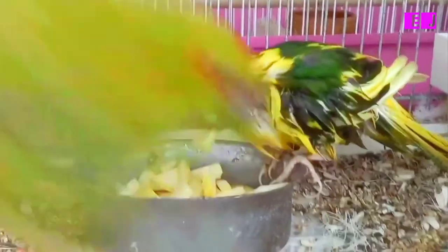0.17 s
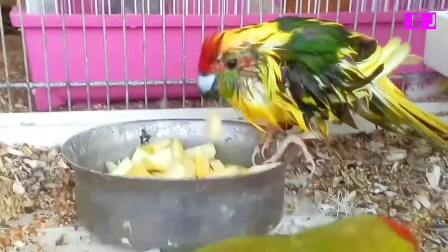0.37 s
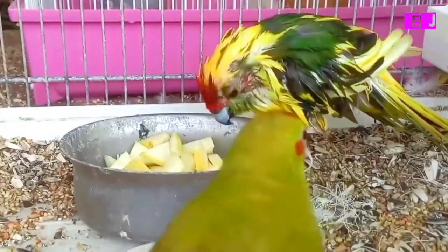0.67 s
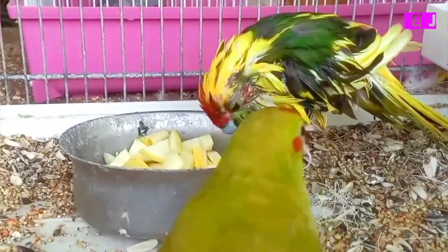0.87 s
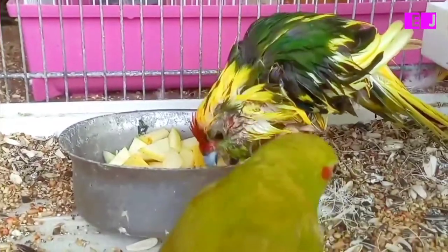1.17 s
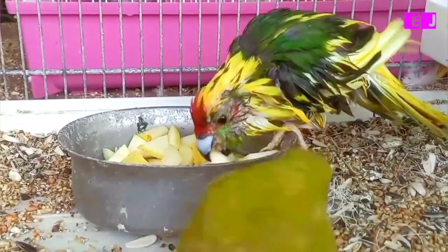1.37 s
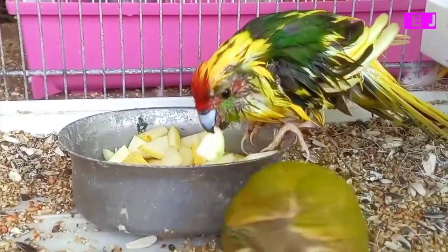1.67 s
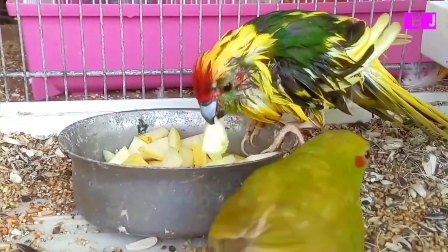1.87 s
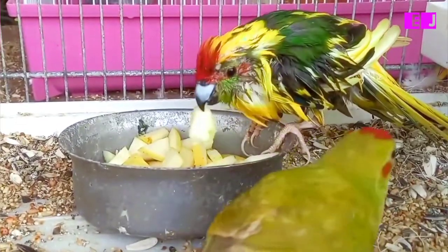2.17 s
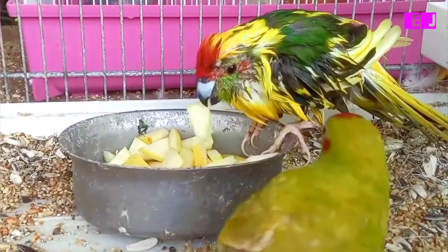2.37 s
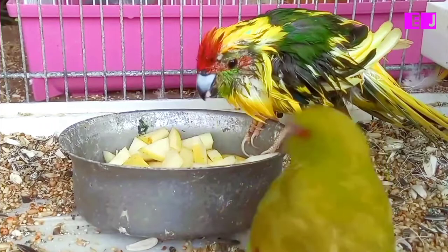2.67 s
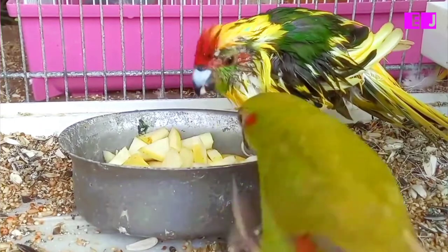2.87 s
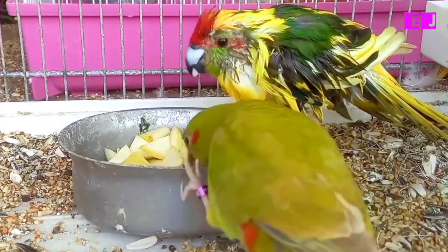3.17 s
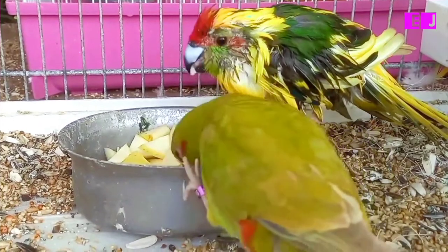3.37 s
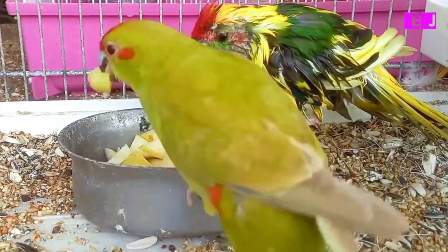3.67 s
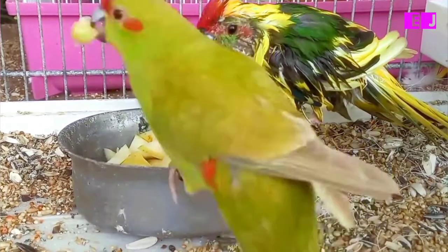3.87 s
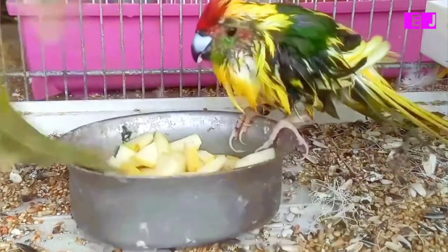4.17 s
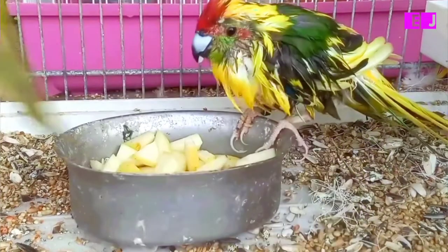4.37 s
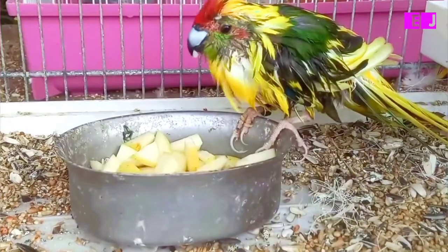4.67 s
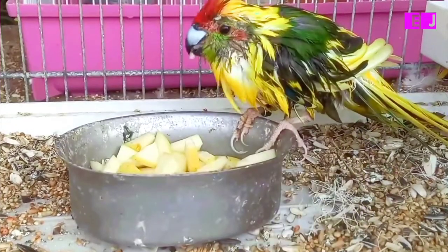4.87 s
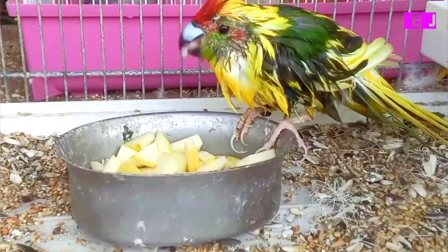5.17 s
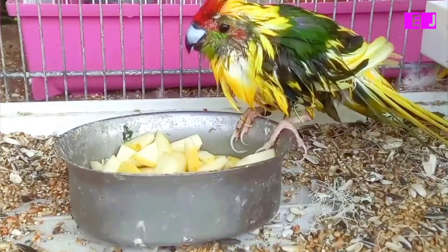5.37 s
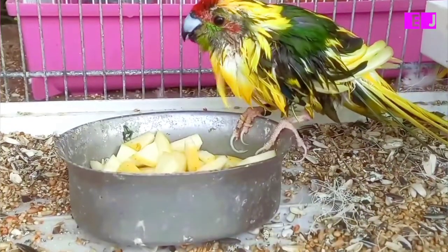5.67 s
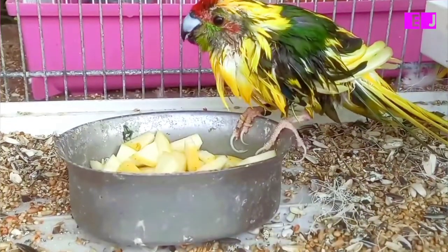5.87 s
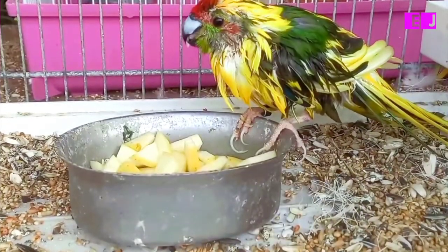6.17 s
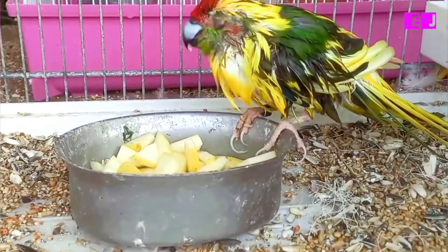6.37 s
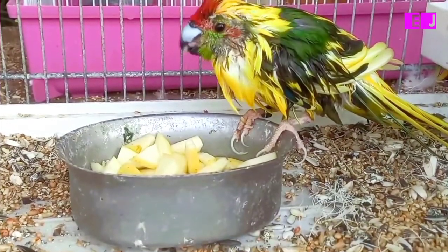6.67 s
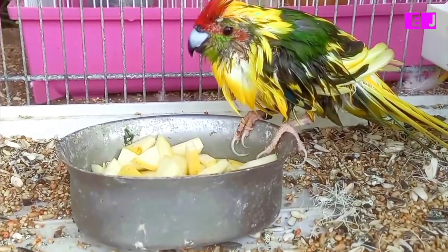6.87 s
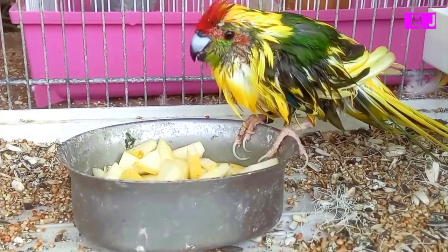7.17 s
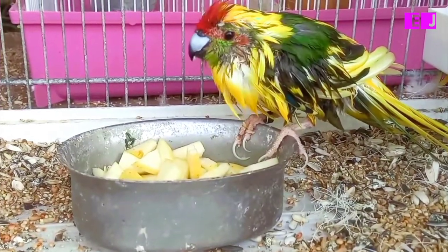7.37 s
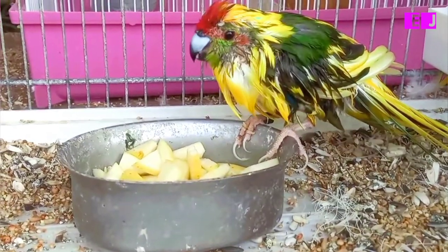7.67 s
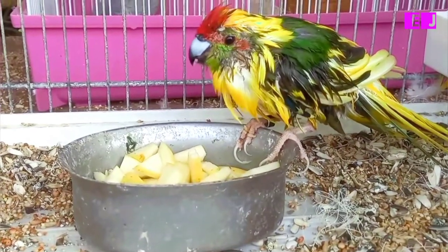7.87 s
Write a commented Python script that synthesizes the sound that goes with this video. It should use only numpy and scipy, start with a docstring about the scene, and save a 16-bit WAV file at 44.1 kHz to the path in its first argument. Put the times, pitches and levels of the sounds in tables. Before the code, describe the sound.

Very close to a cage floor, a sharp metal bowl knock with wire twang and a wing thump opens, then light beak ticks and rustling husks. Around four seconds a bird takes off with clatter, flutter and heavy left-side air thumps. After a lull, a nearby parrot shrieks painfully loud, distorting and echoing in the room. Quiet hiss, soft low hums and distant chirps finish.

```python
"""In a lively room, two small parrots feed from a steel bowl in a cage, a hand's width from a phone.
Beaks and claws tap as bursts of noise; bowl, wires and tray ring as decaying modes; feathers and husks rustle
as grainy noise. Wing gusts thump the left microphone port as a damped low tone with eddies.
Far birds chirp as bending tones and one bird close by shrieks so loudly that the input saturates.
Hiss and a swelling low rumble lie underneath."""
import sys
import numpy as np
from scipy import signal
from scipy.fft import rfft, irfft
from scipy.io import wavfile
from scipy.ndimage import uniform_filter1d

SR = 44100
rng = np.random.default_rng(int(sys.argv[2]) if len(sys.argv) > 2 else 0)


def dump(signal):
    """Clip the signal to [-1, 1] and save it as 16-bit WAV at the path in sys.argv[1]."""
    limited = np.clip(np.atleast_2d(signal).T, -1, 1)
    pcm = np.round(limited * 32767).astype(np.int16)
    wavfile.write(sys.argv[1], SR, pcm)


N = 353196
T = np.arange(N) / SR

# Resonant modes of the steel bowl: mode_hz, level_db, t60_s
BOWL_MODES = [(1478, -2, 0.05), (1505, -2, 0.13), (1550, -10.5, 0.08), (2350, -3, 0.05),
              (3003, -18.5, 0.069), (4280, -4, 0.046), (5000, -5, 0.1), (6320, -3, 0.084),
              (6600, -3.5, 0.039)]
# Resonant modes of the plastic tray: mode_hz, level_db, t60_s
TRAY_MODES = [(279, -5, 0.12), (402, -6, 0.067), (489, -2, 0.04), (536, -5.5, 0.14), (729, -6, 0.036),
              (819, -5, 0.042)]


def undb(db):
    """Amplitude ratio from dB."""
    return 10 ** (np.asarray(db) / 20)


def sides(pan_db):
    """Left and right gains, as a column, for a left minus right level difference."""
    return undb(np.array([[pan_db], [-pan_db]]) / 2)


def colour(x, points):
    """Shapes the spectrum along (Hz, dB) points on a log frequency axis."""
    hz, db = np.transpose(points)
    size = x.shape[-1]
    bin_hz = np.fft.rfftfreq(size, 1 / SR)
    gain_db = np.interp(np.log(bin_hz + 1), np.log(hz), db)
    return irfft(rfft(x) * undb(gain_db), size)


def bandpass(x, lo_hz, hi_hz):
    """Second-order Butterworth band-pass."""
    return signal.sosfilt(signal.butter(2, [lo_hz, hi_hz], "band", fs=SR, output="sos"), x)


def band(x, lo_hz, hi_hz):
    """Band-pass scaled to unit rms."""
    y = bandpass(x, lo_hz, hi_hz)
    return y / np.sqrt(np.mean(y ** 2))


def add(out, s, sound):
    """Mixes a sound in at s seconds."""
    i = int(s * SR)
    out[:, i:i + sound.shape[1]] += sound[:, :N - i]


def walk(rate_hz, size=N):
    """Random levels held 1 / rate_hz and slewed twice; spread near 1."""
    hold = int(SR / rate_hz)
    steps = np.repeat(rng.standard_normal(size // hold + 1), hold)
    return 1.3 * uniform_filter1d(uniform_filter1d(steps, hold), hold)[:size]


def room(x):
    """Diffuse echoes, unrelated left and right, each band dying at its own rate."""
    # Reverberation time by band: band_hz, t60_s
    room_t60 = [(250, .45), (1000, .4), (3000, .47), (6000, .44), (12000, .3)]
    t, tail = T[:SR], 0
    for hz, t60_s in room_t60:
        noise = band(rng.standard_normal((2, SR)), hz * .55, hz * 1.6)
        tail = tail + np.sqrt(hz) * noise * undb(-60 * t / t60_s)
    tail = tail * np.clip((t - .004) / 0.0085, 0, 1)  # echoes start at 4 ms and build up over 8.5 ms
    tail = tail / np.sqrt(np.sum(tail ** 2) / 2)
    return signal.fftconvolve(x, tail, axes=1)[:, :N]


def part_shared_noise(size):
    """Two-channel noise with a weaker part common to both channels."""
    return rng.standard_normal((2, size)) + 0.79 * rng.standard_normal((1, size))


def hiss():
    """Coloured room and microphone noise, mostly unrelated left and right, wavering slowly."""
    # Noise spectrum, relative: hz, density_db_per_hz
    hiss_spectrum = [(20, -49), (45, -24.5), (75, -2), (125, -16), (170, -16.5), (280, -15.5), (450, -19.5),
                     (700, -24), (1300, -27), (3000, -41.5), (5500, -39.5), (15300, -35)]
    # Noise balance: hz, left_minus_right_db
    hiss_balance = [(60, 3), (700, 0.5), (1500, -9), (15000, 0)]
    noise = colour(part_shared_noise(N), hiss_spectrum)
    noise[0] = colour(noise[0], hiss_balance)
    level_db, waver_db = -54, 1.2
    return noise / np.sqrt(np.mean(noise ** 2)) * undb(level_db + waver_db * walk(3))


def rumble():
    """Low band of noise that swells and sinks."""
    # Rumble level: time_s, level_db
    rumble_level = [(0.0, -45), (0.42, -50), (0.82, -53.5), (3.46, -53.5), (3.97, -49.5), (4.32, -42),
                    (4.48, -49), (5.02, -51), (5.57, -45), (5.87, -59.5), (7.65, -47), (8.01, -54)]
    swell_db = 2.5
    noise = band(band(part_shared_noise(N), 55, 110), 54, 160)
    level_db = np.interp(T, *np.transpose(rumble_level)) + swell_db * walk(4.5)
    return noise * undb(level_db) * sides(3.3)


def whistle(hz, db, second_db, rough):
    """A near sine with its octave; roughness shakes pitch and amplitude irregularly."""
    slow, quick, size = (walk(rate, size=len(hz)) for rate in (150, 900, 700))
    shaken_hz = hz * (1 + .004 * slow + .12 * rough * quick)
    phase = 2 * np.pi * np.cumsum(shaken_hz) / SR
    return undb(db) * (1 + rough * size) * (np.sin(phase) + undb(second_db) * np.sin(2 * phase))


def bending_tones(calls, rough):
    """Short tones under a rounded envelope; pitch bends fast at first, then settles at its end value."""
    out = np.zeros((2, N))
    for s, length_s, start_hz, end_hz, db, second_db, pan_db in calls:
        part = np.arange(0, length_s, 1 / SR) / length_s
        hz = end_hz + (start_hz - end_hz) * (1 - part) ** 2
        shape = np.sin(np.pi * part ** 0.86)
        add(out, s, shape * whistle(hz, db, second_db, rough) * sides(pan_db))
    return out


def hums():
    """Soft low tones with slight roughness."""
    # Low tones: start_s, length_s, start_hz, end_hz, level_db, second_partial_db, left_minus_right_db
    hum_calls = [(5.83, .1, 327, 346.7, -53.5, -25, 0), (6.33, 0.1, 338, 335.5, -52.5, -30.5, 0.0017),
                 (6.55, 0.076, 330, 347, -55, -28, 0.00079), (6.86, 0.085, 339, 350, -45, -31, 0.0062)]
    return bending_tones(hum_calls, rough=.05)


def chirps():
    """Far birds: brief, slightly rough bending tones."""
    # Far chirps: start_s, length_s, start_hz, end_hz, level_db, second_partial_db, left_minus_right_db
    chirp_calls = [(1.012, 0.06, 2560, 2810, -51, 0, -16.5), (1.045, 0.047, 1303, 1414, -52, -36.5, -5),
                   (1.122, 0.043, 2720, 2826, -42, -9.5, 2), (6.628, 0.043, 5150, 4960, -39, -38, -8.5),
                   (6.642, 0.027, 6400, 6170, -51, -32, 8), (6.93, 0.057, 1360, 1433, -50, -9.5, -3),
                   (7.308, 0.042, 4980, 4916, -34.5, -38, -5), (7.325, 0.0075, 6100, 6100, -42, -30, -5),
                   (7.415, 0.065, 3080, 2770, -45.5, -28, -1), (7.455, 0.037, 5130, 4780, -33, -26, 3.5),
                   (7.74, 0.061, 2765, 3040, -43.5, -5, -2), (7.855, .058, 2833, 2954, -40, -7.5, 7)]
    return bending_tones(chirp_calls, rough=.09)


def shriek():
    """Two piercing notes, the second sliding down and breaking up into hoarse air."""
    # Pitch track of each of the two notes: time_s, pitch_hz, level_db, second_partial_db, roughness (0-1)
    shriek_notes = [
        [(5.461, 3838, -38.5, -22, 0.01), (5.468, 3870, -6, -25.5, 0), (5.476, 3878, 1.5, -22, 0.06),
         (5.495, 3831, 6, -5, 0.14), (5.52, 3624, 11.5, -16.5, 0.12), (5.545, 3654, 8.5, -19.5, 0.19),
         (5.555, 3680, -29, -39.5, 0)],
        [(5.542, 2800, -13.5, -2.5, .05), (5.555, 2755, 1, -10.5, .05), (5.605, 2691, 3, -2, .07),
         (5.63, 2408, -3.5, 7.5, .12), (5.66, 1933, -16, 20, .25), (5.685, 2040, -18, 19, 0.91),
         (5.71, 2192, -22.5, 5.5, 0.94), (5.73, 2244, -16.5, 1.5, 1.04)],
    ]
    pan_db, left_lag_samples = 3.3, 3
    out, air = np.zeros((2, N)), band(rng.standard_normal(SR), 4400, 11000)
    for note in shriek_notes:
        s, *columns = np.transpose(note)
        t = np.arange(s[0], s[-1], 1 / SR)
        hz, db, second_db, rough = (np.interp(t, s, c) for c in columns)
        hoarse = undb(db + second_db - 8.5) * rough * air[:len(t)]
        voice = whistle(hz, db, second_db, rough) + hoarse
        add(out, s[0], voice * sides(pan_db))
    return np.array([np.roll(out[0], left_lag_samples), out[1]])


def gusts():
    """Pushes of air ring the low resonance of the microphone port; eddies buffet above it."""
    # Wing gusts: start_s, left_level_db, left_minus_right_db, rise_ms, eddy_share_db
    gust_events = [(.218, -8, 7, 13, -22.5), (0.266, -17, 6, 10, -19.5), (4.174, -3, 18, 21.6, -29),
                   (4.215, -21, 18, 12.6, -5.5), (4.24, -9, 24, 8.3, -20), (4.339, -12, 36, 18, -4),
                   (4.367, 4, 53, 6, -21), (4.409, -3.5, 43.5, 29, -33)]
    port_hz, port_t60_s = 76.8, 0.13
    out, t = np.zeros((2, N)), T[:SR // 4]
    tone = np.sin(2 * np.pi * port_hz * t)
    eddies = band(band(rng.standard_normal((len(gust_events), len(t))), 110, 240), 95, 400)
    for (s, db, pan_db, rise_ms, eddy_db), eddy in zip(gust_events, eddies):
        rise_s = rise_ms / 1000
        rise = np.sin(np.pi / 2 * np.minimum(t / rise_s, 1))
        push = rise * undb(-60 * np.maximum(t - rise_s, 0) / port_t60_s)
        add(out, s, push * (tone + undb(eddy_db) * eddy) * undb([[db], [db - pan_db]]))
    return out


def rustle():
    """Dense tiny scrapes in three registers: a slow bed plus swishes, roughened by random grains."""
    # Steady stirring of feathers and husks, middle register before graining: time_s, level_db
    stirring = [(0, -60.5), (.5, -63.5), (1.3, -64), (1.55, -64.5), (2.3, -69), (2.8, -64), (3.5, -68),
                (3.75, -64.5), (4.15, -55.5), (4.4, -62), (4.9, -64), (5.4, -66.5), (5.55, -77.5),
                (6.2, -80), (6.4, -70.5), (7.1, -72.5), (7.5, -57), (8.01, -67)]
    # Wing flicks and scuffles through the husks, middle register before graining:
    # start_s, rise_s, fade_t60_s, level_db, share_above_8khz_db, share_under_2khz_db
    swishes = [(.105, 0.0037, 0.14, -49, 4, -10), (0.2, 0.0026, 0.28, -24, -7, 0.5),
               (.5, 0.074, 0.24, -54.5, -13, 1), (.691, 0.011, 0.15, -43.5, -15, -5.5),
               (0.829, 0.0069, 0.18, -46, -1.5, -10.5), (0.998, 0.052, 0.6, -49, -1, -26.5),
               (1.364, .003, 0.29, -51.5, 16.5, -27), (1.398, 0.0029, 0.7, -42, -15, -13),
               (1.59, .003, 0.4, -46, -1, -21), (1.766, 0.0073, 0.37, -44, -4, -18),
               (1.83, 0.033, .4, -54.5, -1, -16), (2.018, 0.015, 0.33, -50, -20, -7.5),
               (2.08, 0.021, .12, -50.5, -21, -2.5), (2.609, 0.017, 0.5, -47, -9.5, -9),
               (2.717, 0.028, 0.33, -38, -10, -19), (2.91, 0.0053, 0.37, -50, 3.5, -2),
               (3.02, 0.03, 0.3, -66, -7, 19.5), (3.545, 0.042, 0.42, -38, -12.5, -37),
               (3.64, 0.0026, 0.15, -30.5, 18, -40), (3.66, 0.015, 0.26, -36.5, 6.5, -40),
               (3.76, 0.013, 0.36, -41.5, 3, -25), (3.858, .003, 1, -48, 5, -7),
               (3.947, 0.026, 0.078, -38.5, 13, -5), (4, 0.015, 0.14, -33.5, 9.5, 1),
               (4.09, .006, 0.51, -58, 14, -25), (4.133, 0.04, 0.24, -34.5, 10, -10.5),
               (4.228, 0.026, 0.19, -41.5, 19.5, -8.5), (4.52, 0.0047, 0.29, -57.5, 14, -14),
               (4.878, 0.036, 0.54, -61.5, 11, 2.5), (5.169, .13, 0.63, -41.5, 1.5, -9),
               (5.3, 0.056, 0.46, -43.5, 2, -9.5), (6.299, .034, 0.6, -58, 9, -1.5),
               (6.73, 0.067, 0.55, -56, 0.5, -5), (6.882, 0.022, 0.58, -48, 8, -2.5),
               (7.15, 0.0083, 0.29, -66.5, 14, 9), (7.4, 0.027, 0.15, -55, 19, -15),
               (7.428, 0.015, 0.31, -51.5, 19.5, -6)]
    bed_high_db, bed_low_db, pan_db = 1, -1.5, 1
    flicker_db, patch_db = 0.84, 2  # quick and slow wavering

    bed_db = np.interp(T, *np.transpose(stirring))
    power = undb([[0], [bed_high_db], [bed_low_db]] + bed_db) ** 2  # rows: middle, high, low
    for s, rise_s, t60_s, db, high_db, low_db in swishes:
        t = T[:int((rise_s + t60_s) * SR)]
        fade_db = -60 * np.maximum(t - rise_s, 0) / t60_s
        shape = np.minimum(t / rise_s, 1) ** 2 * undb(db + fade_db)
        add(power, s, (undb([[0], [high_db], [low_db]]) * shape) ** 2)

    crunch = uniform_filter1d((rng.random(N) < 900 / SR) * rng.exponential(1, N), size=24) * 24
    # Middle and low registers waver in two halves each: register row, lo_hz, hi_hz, noise width_hz
    halves = [(0, 2100, 4000, 5100), (0, 4000, 7200, 5100), (1, 8000, 14800, 6800),
              (2, 280, 900, 1720), (2, 900, 2000, 1720)]
    out = np.zeros((2, N))
    for register, lo_hz, hi_hz, width_hz in halves:
        waver = undb(flicker_db * walk(80) + patch_db * walk(14))
        grains = (1 + 0.3 * crunch) * waver * np.sqrt(power[register])
        noise = bandpass(grains * rng.standard_normal((2, N)), lo_hz, hi_hz)
        out += noise * np.sqrt(SR / 2 / width_hz)
    return out * sides(pan_db)


def rattle(x, modes, start_db):
    """Scrapes stronger than about start_db reach a hard object and keep its modes buzzing."""
    power = uniform_filter1d(x ** 2, size=441)
    drive = x * power / (power + undb(2 * start_db))
    out = 0
    for hz, db, t60_s in modes:
        q = hz * t60_s * np.pi / np.log(1000)
        out = out + undb(db) * signal.lfilter(*signal.iirpeak(hz, q, fs=SR), drive)
    return out


def struck(blows, modes, scatter_db):
    """Every blow rings the same decaying modes in new shares, slightly detuned."""
    out, t = np.zeros((2, N)), T[:SR // 3]
    hz, mode_db, t60_s = (c[:, None] for c in np.transpose(modes))
    for s, db, pan_db, tilt_db in blows:
        share, detune, phase = rng.standard_normal((3, len(modes), 1))
        tilt = tilt_db * np.log2(hz / hz[0])
        gain = undb(db + mode_db + tilt + scatter_db * share - 60 * t / t60_s)
        pitch_hz = hz * (1 + .003 * detune[0])  # all modes move together
        ring = np.sum(gain * np.sin(2 * np.pi * pitch_hz * t + 2 * phase), axis=0)
        add(out, s, .5 * sides(pan_db) * ring * np.minimum(t / 0.00025, 1))
    return out


def steps():
    """Feet excite the modes of the plastic tray."""
    # Footfalls, relative levels: start_s, level_db, left_minus_right_db, sharpness_db_per_octave
    footfalls = [(0.201, -19.5, -5, 3), (0.211, -30, 1.5, 4), (0.401, -38, -1, 4.5), (1.395, -48, -23.5, 4),
                 (1.585, -33.5, 1, 1.5), (1.771, -42.5, 4, -3), (1.956, -40.5, -1.5, 0.5),
                 (2.089, -44, -4.5, -4), (2.468, -51.5, 2, 8.5), (3.023, -34, 0.5, 5),
                 (3.051, -48.5, -6, 10.5), (4.016, -44, 13.5, 1.5), (7.41, -39, -22, -4)]
    return struck(footfalls, TRAY_MODES, 3.8)


def twangs():
    """Cage wires ring on a few high modes."""
    # Wire blows, relative levels: start_s, level_db, left_minus_right_db, sharpness_db_per_octave
    wire_blows = [(0, -35.5, 1, -2.5), (.135, -45.5, -2, 9), (.2, -21, 10, -5.5), (3.643, -37, -6, -10),
                  (3.858, -41, 7, 6), (4.63, -57, 0, 11.5), (4.69, -63, 3.5, 12.5), (4.76, -59, 3.5, 10.5),
                  (6.267, -45.5, 2.5, 6), (6.31, -47.5, 5.5, 3.5)]
    # Resonant modes of the cage wires: mode_hz, level_db, t60_s
    wire_modes = [(2290, 0, .32), (5750, -2, .28), (9990, -9, .18), (14700, -19, .14)]
    return struck(wire_blows, wire_modes, 1.5)


def knocks():
    """Knocks excite the modes of the steel bowl."""
    # Bowl blows, relative levels: start_s, level_db, left_minus_right_db, sharpness_db_per_octave
    bowl_blows = [(0.1968, -8.5, -1, -1), (0.2117, -15, -2.5, -8.5), (2.93, -49.5, -15, 11),
                  (3.026, -39, -5, -13), (3.0533, -37.5, -5.5, -7), (3.6444, -39, -18.5, -1),
                  (3.859, -28, -10, -2.5), (3.8797, -31.5, -11, -6), (3.97, -24, 4, -15),
                  (3.9896, -22, 1, -6), (4.016, -23, -13.5, -3.5), (6.8924, -47.5, -1, 6)]
    return struck(bowl_blows, BOWL_MODES, 1.0)


def taps():
    """Beak and claw cracks of noise around a centre over a broad click, each trailed by scattering husks."""
    # Taps, nominal peak levels: start_s, level_db, centre_hz, left_minus_right_db, t60_ms
    tap_events = [(0.1033, 0, 7200, 17, 4.7), (.199, 23.5, 2250, -9, 8.7), (0.2118, -1.5, 1850, -2, 64),
                  (0.599, -33.5, 6380, 3.5, 27), (.7032, -25.5, 5160, -1, 27), (0.7075, -27, 5830, 0, 27),
                  (0.817, -13.5, 4600, -3.5, 29), (0.8306, -12.5, 4160, 14, 6.7),
                  (1.3329, -36, 2230, -8.5, 17), (1.369, -29.5, 7000, 11, 13), (1.3945, -3.5, 5500, 6, 16),
                  (1.41, -32, 1500, 0, 40), (1.454, -23, 2800, 2, 16), (1.497, -31, 4940, 9, 17),
                  (1.585, -10.5, 5600, 2, 28), (1.7793, -20, 3780, 9, 22), (1.7856, -25, 3380, -17, 16),
                  (2.092, -31.5, 2460, 0, 26), (2.6386, -30, 6040, 18, 15), (2.7437, -34, 3700, 5, 18),
                  (2.7746, -11.5, 2480, 1, 3.5), (2.826, -24.5, 5300, 12, 15), (2.9172, -32, 5540, 10, 11),
                  (2.9317, -33.5, 7200, 27.5, 38), (2.981, -38, 1900, 0, 9), (3.051, -34, 1540, -2, 11),
                  (3.1733, -34, 2290, 1, 11), (3.2385, -29.5, 1460, 2.5, 8.6), (3.263, -35, 2494, -2, 13),
                  (3.5507, -29, 5500, -5, 11), (3.57, -24.5, 4530, 6, 11), (3.589, -21.5, 4770, 17, 11),
                  (3.596, -20, 2640, -1, 21), (3.643, -9, 12400, -1, 4), (3.6694, -17, 12600, -0.5, 11),
                  (3.7144, -18.5, 9180, 3, 15), (3.7768, -3, 5750, 1, 6.4), (3.839, -26, 6730, 6, 16),
                  (3.8564, -10.5, 11600, 1, 24), (4.0048, -22, 1520, -6, 14),
                  (4.0192, -7.5, 7500, 10.5, 9.8), (4.03, -12, 6900, -1, 8), (4.093, -23.5, 8650, 16, 24),
                  (4.142, -22.5, 6580, 5, 90), (4.1874, -4.5, 12200, 9, 15), (4.375, -29, 900, 25, 23),
                  (4.519, -23, 6400, 12.5, 13), (4.9087, -29, 1570, 4, 8.2), (5.037, -36, 9500, 13, 83),
                  (6.3973, -34, 5940, 3, 11), (6.765, -34, 11000, 3, 11), (7.1546, -35, 1480, 8, 15),
                  (7.186, -33.5, 9700, 7, 17), (7.4123, -33, 5160, 13, 20)]
    trail_db, trail_t60_s = -21, .02
    crest_db = 12  # peaks of noise over its rms
    out, t = np.zeros((2, N)), T[:8192]
    trail = undb(trail_db - 60 * t / trail_t60_s)
    attack = np.minimum(t / 0.00048, 1)
    for s, db, hz, pan_db, t60_ms in tap_events:
        noise = rng.standard_normal((2, 8192)) + 0.49 * rng.standard_normal(8192)
        crack = band(noise, hz * 0.65, hz * 1.47) + 0.79 * band(noise, hz * 0.29, 14000)
        shape = (undb(-60 * t / (t60_ms / 1000)) + trail) * attack
        add(out, s, undb(db - crest_db) * shape * crack * sides(pan_db))
    return out


def scene():
    """Sums all layers; near, loud and far sources feed the room at their own levels."""
    far = chirps() + hums()
    loud = shriek()
    near = steps() + twangs() + knocks() + taps()
    wet = room(undb(-28.0) * near + undb(0.5) * loud + undb(-2) * far)
    scrapes = rustle()
    bowl_buzz = undb(5) * rattle(scrapes, BOWL_MODES, -40)
    tray_buzz = undb(8) * rattle(scrapes, TRAY_MODES, -44)
    return hiss() + rumble() + far + loud + wet + gusts() + scrapes + bowl_buzz + tray_buzz + near


def record(dry):
    """The microphone has a peak and a notch in the treble, the input stage saturates, the top is cut."""
    # Microphone response: hz, gain_db
    mic_response = [(200, 0), (3000, 0), (5000, 2), (6600, 5), (7150, 0), (7500, -9), (8300, -8),
                    (9200, -3), (12000, 0)]
    knee, top_hz = 5.0, 15450  # larger knee = harder clipping
    x = colour(dry, mic_response)
    saturated = x / (1 + np.abs(x) ** knee) ** (1 / knee)
    return signal.sosfilt(signal.ellip(8, .2, 60, top_hz, fs=SR, output="sos"), saturated)


dry = scene()
out = record(dry)
dump(out)
```